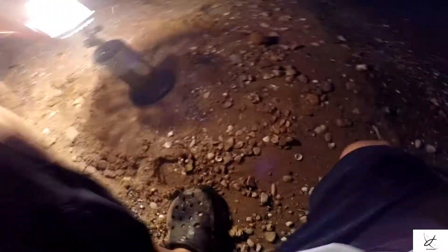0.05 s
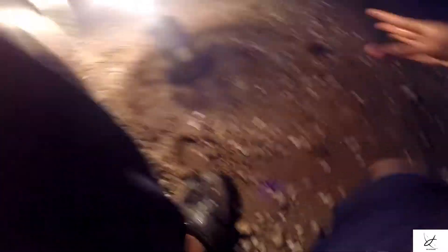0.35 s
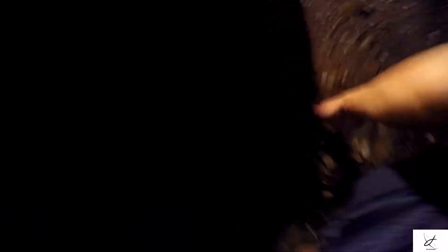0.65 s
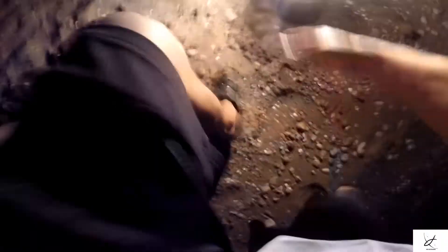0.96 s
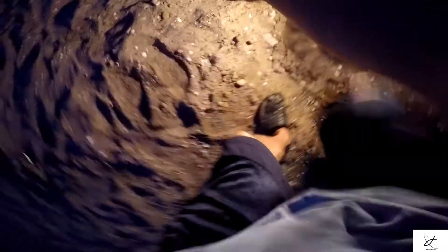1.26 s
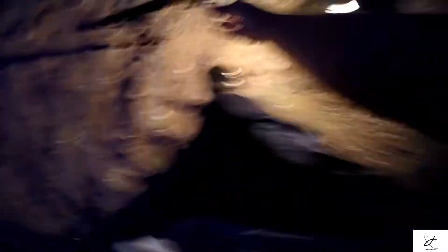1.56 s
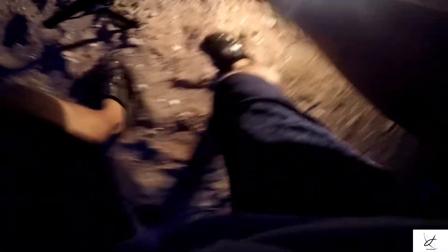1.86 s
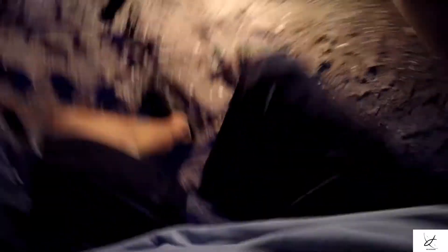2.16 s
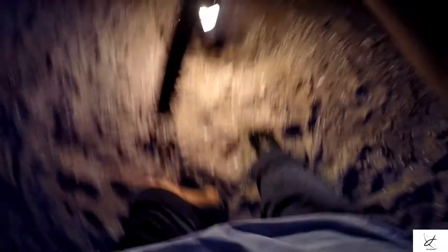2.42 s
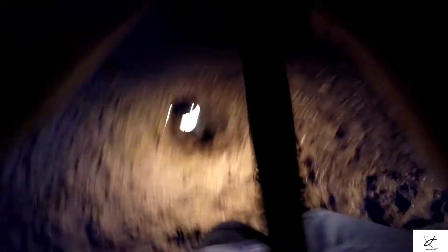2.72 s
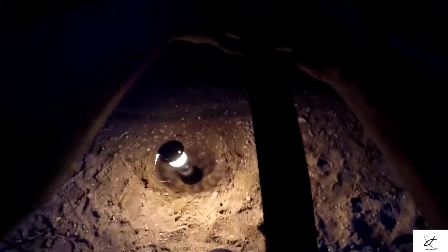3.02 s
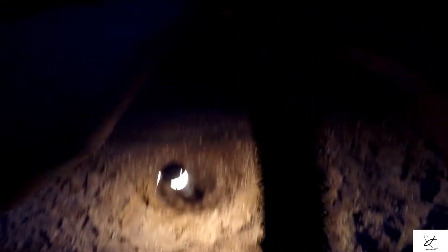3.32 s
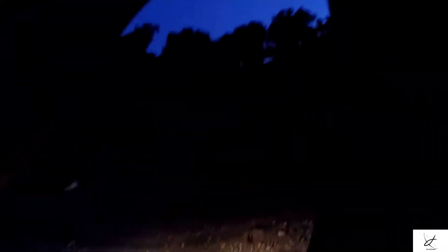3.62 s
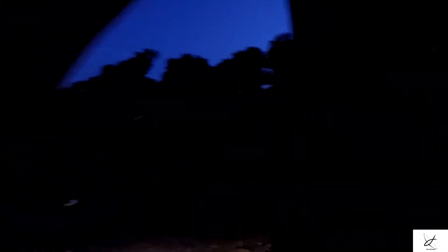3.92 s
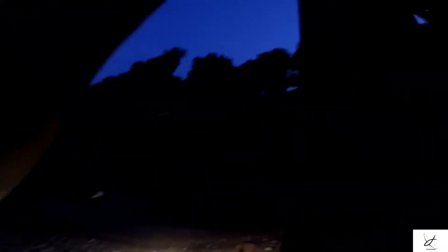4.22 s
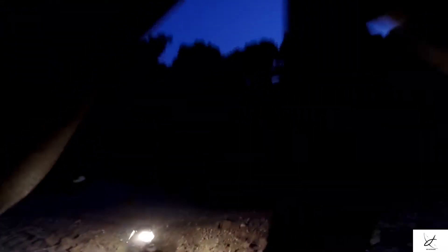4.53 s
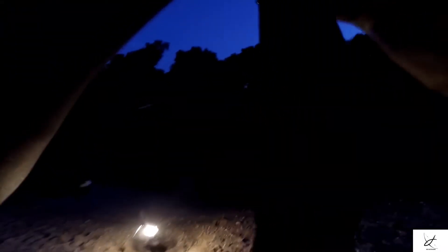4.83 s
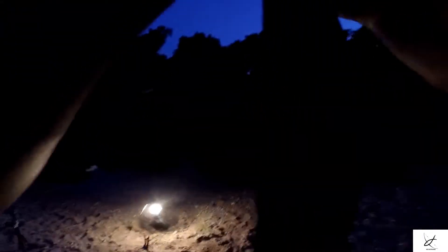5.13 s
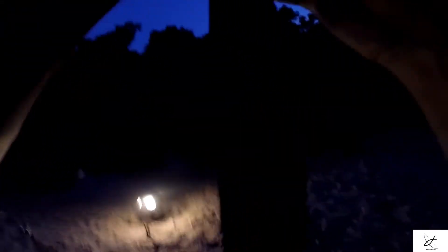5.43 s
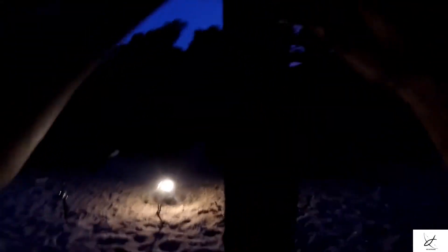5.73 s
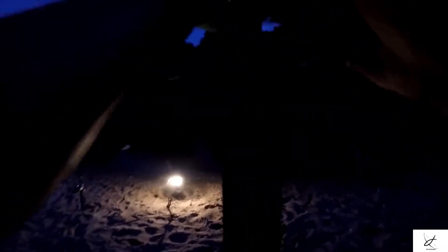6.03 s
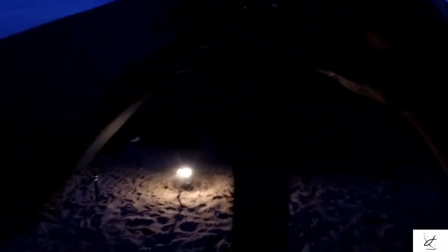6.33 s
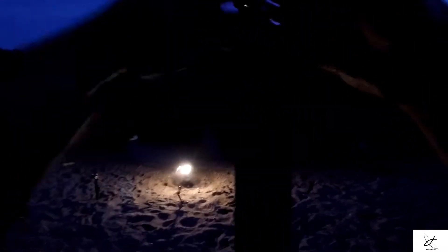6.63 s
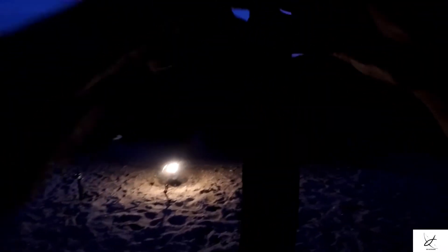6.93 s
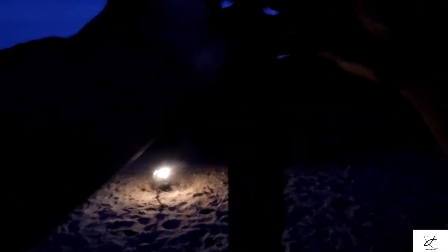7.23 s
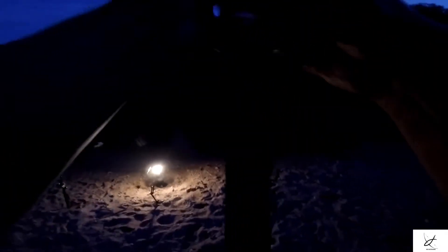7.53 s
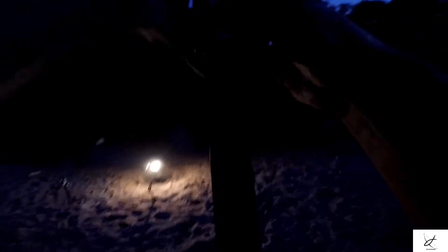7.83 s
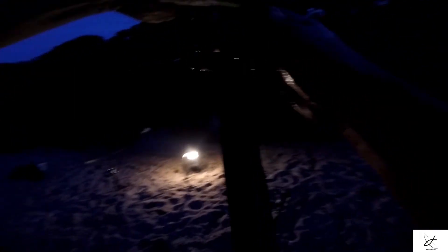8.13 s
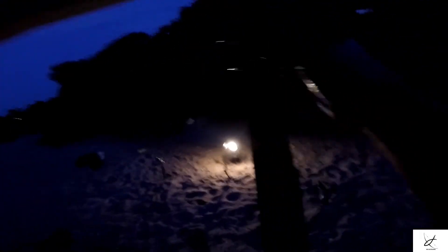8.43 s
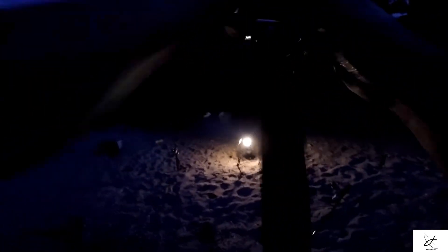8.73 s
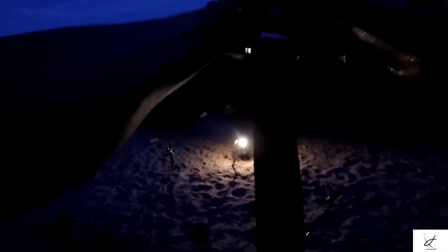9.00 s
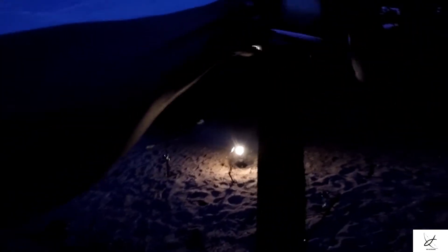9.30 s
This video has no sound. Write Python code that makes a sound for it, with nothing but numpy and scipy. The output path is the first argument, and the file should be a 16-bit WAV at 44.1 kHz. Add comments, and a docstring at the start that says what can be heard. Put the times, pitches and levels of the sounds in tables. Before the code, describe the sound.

A fishing reel ratchet whirrs in short runs, then cranking knocks and a small jingling bell sound close over rumbling clothes.

```python
"""A fishing reel's ratchet whirrs in four runs and snaps single clicks as its catch drops over the teeth.
An angler on a riverbank at night picks up the rod and cranks, close to a body-worn camera.
Every jolt jingles a small bite bell on the rod. Loose parts knock and clack, line rasps on the spool,
and clothes rub and rumble against the microphone."""
import sys
import numpy as np
from scipy import signal
from scipy.fft import rfft, irfft, next_fast_len
from scipy.io import wavfile
from scipy.ndimage import uniform_filter1d

SR = 44100
rng = np.random.default_rng(int(sys.argv[2]) if len(sys.argv) > 2 else 0)


def transcribe(signal):
    """Save signal, clipped to [-1, 1], as a 16-bit WAV file at the path in sys.argv[1]."""
    frames = np.atleast_2d(signal).T
    limited = np.clip(frames, -1, 1)
    pcm = np.round(limited * 32767).astype(np.int16)
    wavfile.write(sys.argv[1], SR, pcm)


N = 421596
T = np.arange(N) / SR


def amp(db):
    """Turns decibels into a volume factor."""
    return 10 ** (np.asarray(db) / 20)


def at_pitch(table, hz):
    """Looks up a frequency table at any pitch."""
    f, value = np.transpose(table)
    return np.interp(np.log(hz + 1), np.log(f), value)


def at_time(table, t=T):
    """Looks up a time table, normally at every sample."""
    return np.interp(t, *np.transpose(table))


def add(mix, at, sound):
    """Mixes a sound in, starting at a time in seconds."""
    part = mix[:, max(round(at * SR), 0):][:, :sound.shape[1]]
    part += sound[:, :part.shape[1]]


def drift(hz):
    """A slow random wobble, moving at up to about hz."""
    slow = irfft(rfft(rng.standard_normal(N)) / (1 + (np.fft.rfftfreq(N, 1 / SR) / hz) ** 4), N)
    return slow / slow.std()


# How alike the microphone's left and right openings sound: f/Hz, likeness (1 same, -1 opposite)
LIKENESS = [(40, 0.19), (130, -0.75), (200, -0.22), (300, 0.34), (1400, -0.19), (3100, 0.8), (6800, 0.5),
            (14000, -0.5)]

def resonate(force, tone, side, shared=0.82, size=8192):
    """Two forces shake an object, which gives them its tone; left and right partly agree."""
    hz = abs(np.fft.fftfreq(size, 1 / SR))
    log_gain = np.log(amp(at_pitch(tone, hz)))
    response = np.fft.ifft(np.exp(signal.hilbert(log_gain).conj())).real  # rings only after a push
    length = next_fast_len(N + size)
    a, b = rfft(force, length) * rfft(response / np.linalg.norm(response), length)
    hz = np.fft.rfftfreq(length, 1 / SR)
    lag = np.exp(-1j * np.arccos(np.clip(at_pitch(LIKENESS, hz) / shared, -1, 1)))
    lean = amp(at_pitch(side, hz) / 2)
    right = shared * lag * a + np.sqrt(1 - shared ** 2) * b
    return irfft(np.array([a * lean, right / lean]), length)[:, :N]


def click(length_s, tail_db, size=1100):
    """Hard parts meet, chatter for a moment and stop almost dead."""
    t = np.arange(size) / SR
    fade = np.exp(-(t / length_s) ** 2) + amp(tail_db) * np.exp(-t / .004)
    force = fade * (1 - np.exp(-t / .0003)) * rng.standard_normal((2, size))
    return force / np.linalg.norm(force, axis=1, keepdims=True)


def strike(notes, loose=0.0018, lag=0.74, uneven_db=3, size=18000):
    """A hit rings a part's notes, each fading 60 dB in about its ring time; looseness shifts the pitch."""
    t = np.arange(size) / SR
    hz, db, ring_s, side = np.transpose(notes)[:, :, None]
    share, detune, phase, turn, damping = rng.standard_normal((5, len(notes), 1))
    fade = amp(db + uneven_db * share - 60 * t / ring_s * np.exp(.2 * damping))
    ring = fade * np.exp(2j * np.pi * (hz * (1 + loose * detune) * t + phase))
    ring *= 1 - np.exp(-(t / .0007) ** 2)
    left = ring * amp(side / 2)
    right = ring / amp(side / 2) * np.exp(-1j * (lag + .5 * turn))
    return np.array([left.sum(0).imag, right.sum(0).imag])


def grit(pressure, per_s, spread_db, count=120, size=900):
    """Rubbing surfaces slip in tiny uneven steps, each a very short ping."""
    t, force = np.arange(size) / SR, np.zeros((2, N + size))
    hz = 200 + 11000 * (np.arange(count)[:, None] + rng.random((count, 1))) / count
    pings = np.exp(2j * np.pi * hz * t - t / .001 * (hz / 2000) ** .5)
    pings /= np.linalg.norm(pings, axis=1, keepdims=True)
    chance, big, which = rng.random(N), rng.exponential(1, N), rng.integers(0, count, N)
    phases = np.exp(2j * np.pi * rng.random((2, N)))
    at = np.flatnonzero(chance < per_s / SR)
    slips = amp(spread_db * np.minimum(big[at], 4))
    slips *= pressure[at] * np.sqrt(2 * N / np.sum(slips ** 2))
    for i, slip in zip(at[slips > 1e-5], slips[slips > 1e-5]):
        force[:, i:i + size] += slip * (phases[:, i, None] * pings[which[i]]).real
    return force[:, :N]


# Levels in all tables are relative. How hard the hands work, and how much the body sways: t/s, level/dB
EFFORT = [(0, -40.5), (0.7, -41.5), (0.95, -49.5), (1.4, -48.5), (3.2, -51), (3.9, -37.5), (5.15, -41.5),
          (5.9, -40), (6.3, -42), (7.1, -48.5), (8.7, -46.5), (9, -47.5), (9.56, -42)]
SWAY = [(0, -40.5), (.68, -17), (.92, -29.5), (1.4, -34.5), (1.78, -22.5), (1.95, -36), (3.2, -41),
        (4, -22.5), (5.2, -18), (6.75, -26), (7.05, -25), (7.46, -21.5), (7.57, -18), (7.68, -29),
        (8.6, -21.5), (9.56, -24.5)]
FULL_EFFORT_DB, RESTING_SWAY_DB = -39, -31
# The tone of rumbling clothes, rustling cloth and scraping gear: f/Hz, level/dB
RUMBLE_TONE = [(10, -6.5), (30, -7), (100, -18.5), (200, -35.5), (600, -90)]
RUSTLE_TONE = [(50, -7.5), (140, 7.5), (290, -5.5), (380, -2.5), (600, -11), (1500, -40.5)]
SCRAPE_TONE = [(200, 4.5), (650, -4.5), (850, 4), (1600, 6), (2250, -2.5), (2800, -2.5), (4000, 0.5),
               (5200, -5), (6700, 4), (7700, 0.5), (8600, -9.5), (10000, -6), (11500, -41.5)]
# Which way the rod and clothes lean in stereo: f/Hz, left minus right/dB
ROD_SIDE = [(60, -3), (200, -5), (2000, 2.5), (8000, -1.5)]

def clothes_and_gear(rumble_db=2.5, rustle_db=-33, scrape_db=-37, swish_db=-45, hiss_db=-55, wire_hz=2066):
    """Clothes sway and swish over the microphone while gear catches in uneven scrapes."""
    catching, effort, sway = drift(hz=23.4), at_time(EFFORT) - FULL_EFFORT_DB, at_time(SWAY)
    rumble = amp(sway + rumble_db + 2 * drift(hz=7.8)) * rng.standard_normal((2, N))
    stir = 0.7 * effort + 0.11 * (sway - RESTING_SWAY_DB)
    rustle = amp(stir + rustle_db + 4 * catching) * rng.standard_normal((2, N))
    scrape = grit(amp(effort + scrape_db + 4 * catching), per_s=1700, spread_db=2.5)
    # a thin wire on the reel sings along with the scraping
    wire = amp(10) * signal.lfilter(*signal.iirpeak(wire_hz, wire_hz / 16, SR), scrape)
    hiss = (amp(hiss_db) + amp(effort + swish_db)) * rng.standard_normal((2, N))
    cloth = resonate(rumble, RUMBLE_TONE, ROD_SIDE) + resonate(rustle, RUSTLE_TONE, ROD_SIDE)
    return cloth + resonate(scrape + wire + hiss, SCRAPE_TONE, ROD_SIDE)


def tooth_times(start, end, teeth, top_at, roundness, first_speed, last_speed=.15):
    """When each tooth passes as the spool speeds up and runs down."""
    progress = np.linspace(0, 1, 400)
    slowest = np.where(progress < top_at, first_speed, last_speed)
    from_top = np.interp(progress, [0, top_at, 1], [1, 0, 1])
    turned = np.cumsum(1 - (1 - slowest) * from_top ** roundness)
    marks = np.linspace(turned[0], turned[-1], round(teeth) + 1)
    return np.interp(marks, turned, start + progress * (end - start))


# Pulls of line: start/s, end/s, teeth, fastest point (0-1), roundness of the speed curve,
# starting speed (share of the top), click level/dB, spool ring level/dB
LINE_PULLS = [(.005, .194, 22, .16, .71, .64, 2, -18), (.33, .691, 32, .48, 1.03, .2, 2, -19.5),
              (1.525, 1.8245, 25, .53, 4.2, .29, 7, -21), (2.07, 2.569, 59, .42, .83, .14, 7.5, -25)]
# Single snaps of the catch: t/s, level/dB
LONE_SNAPS = [(1.002, -13), (1.0394, -11), (1.0776, -12.5), (1.131, -12.5), (1.947, -6), (2.973, -15),
              (2.9937, 1.5), (3.167, 1.5), (3.625, 6), (3.7696, -12), (6.127, 6.5), (7.383, 2.5),
              (8.2399, -4.5), (8.5194, -13.5)]
# The tone of a click, and of the catch sliding up a tooth: f/Hz, level/dB
REEL_TONE = [(300, -43), (1200, -16.5), (1900, -8), (2800, -6), (3850, 0), (4550, -3.5), (5400, 1.5),
             (6300, 7.5), (7500, 9), (8700, -2.5), (10400, -8), (12000, -19), (15000, -16.5)]
SLIDE_TONE = [(900, -17), (1900, 7.5), (2700, 2.5), (3800, 7.5), (9000, 7.5)]
# Notes of the reel's housing: f/Hz, level/dB, ring time/s, left minus right/dB
HOUSING_NOTES = [(3700, -20, 0.06, -7), (5000, 2.5, 0.0076, -5)]
# Which way the reel leans in stereo: f/Hz, left minus right/dB
REEL_SIDE = [(3000, 2.5), (6300, 3), (8800, -2), (14000, 1)]
TOOTH, SNAP = (.0032, -6), (.0021, -12)  # click shapes: length/s, tail level/dB

def ratchet(run_db=-0.34, snap_db=15, housing_db=-26, slide_db=-36, fast_teeth_per_s=170, jitter_s=.0005):
    """The catch clicks on every tooth and rings the spool; lone snaps are shorter and harder."""
    clicks, rings = np.zeros((2, 2, N))
    sliding = np.zeros(N)
    spool = [(1920, -3, 0.021, 9)]  # columns as in HOUSING_NOTES
    for *pull, db, ring_db in LINE_PULLS:
        times = tooth_times(*pull)
        gaps = np.gradient(times)
        speeds = 1 / (gaps * fast_teeth_per_s)
        sliding += amp(db + slide_db) * np.interp(T, times, speeds, 0, 0) ** .5
        for at, gap, speed in zip(times + jitter_s * rng.standard_normal(len(times)), gaps, speeds):
            drop = min(gap / .02, 1) ** .2  # at speed the catch has less time to fall
            add(clicks, at, drop * amp(db + run_db + 1.1 * rng.normal()) * click(*TOOTH))
            add(rings, at, drop * amp(ring_db) * strike(spool, loose=0.042, lag=0))
            rasp = strike(HOUSING_NOTES, loose=0.04, lag=0, size=1200)
            add(rings, at, amp(db + housing_db) * speed * rasp)
    for at, db in LONE_SNAPS:
        add(clicks, at, amp(db + snap_db) * click(*SNAP))
        add(rings, at, amp(1.17 * min(db, 0) - 12) * strike(spool, loose=0.05, lag=0))
    slide = grit(sliding, per_s=3400, spread_db=2)
    return resonate(clicks, REEL_TONE, REEL_SIDE) + resonate(slide, SLIDE_TONE, REEL_SIDE) + rings


def swells(rows):
    """Pressure that rises and falls smoothly, once for each row."""
    return sum(amp(db) * np.exp(-(2 * (T - at) / length) ** 2) for at, length, db in rows)


# Sleeves passing the camera: middle t/s, length/s, level/dB
SLEEVE_PASSES = [(.13, 0.24, -30.5), (.805, 0.049, -23.5), (1.76, 0.2, -32), (3.6, 0.26, -31),
                 (8.15, 0.29, -30.5), (8.55, 0.057, -28), (9, 0.28, -35)]

def sleeves(scuff_db=-13):
    """A sleeve brushes the camera case: a soft, low rustle with a little grit."""
    pressure = swells(SLEEVE_PASSES)
    scuff = grit(amp(scuff_db) * pressure, per_s=1500, spread_db=0.5)
    rustle = pressure * rng.standard_normal((2, N))
    return resonate(rustle, RUSTLE_TONE, ROD_SIDE) + resonate(scuff, SCRAPE_TONE, ROD_SIDE)


def stray_taps(per_s, db, effort_slope, spread_db, crank_from_s=3.2):
    """Small chance taps once cranking starts, louder with effort: rows of t/s, level/dB."""
    wait, luck = rng.random((200, 2)).T
    times = crank_from_s + np.cumsum(.5 + wait) / per_s
    effort = at_time(EFFORT, times) - FULL_EFFORT_DB
    levels = db + effort_slope * effort + spread_db * (2 * luck - 1)
    return [(at, level) for at, level in zip(times, levels) if at < N / SR]


# The stronger jolts of the rod: t/s, bell level/dB, clamp level/dB
ROD_JOLTS = [(.124, -23.5, -33), (.236, -20, -26), (.295, -17, -38), (1.261, -31, -34), (1.39, -33, -45),
             (1.456, -30, -48), (2.025, -28.5, -40), (2.657, -24, -37), (3.249, -31, -45),
             (3.369, -29.5, -28), (3.508, -32.5, -28), (3.586, -22, -20), (3.604, -39, -22.5),
             (3.975, -27, -15.5), (4.061, -27, -24.5), (4.219, -25, -17.5), (4.306, -22, -22),
             (4.407, -24, -24), (4.61, -24.5, -16.5), (4.747, -21.5, -15), (4.838, -25.5, -14),
             (4.914, -27, -21.5), (4.95, -20.5, -19.5), (5.016, -25.5, -18.5), (5.088, -25, -15.5),
             (5.163, -22, -19.5), (5.324, -26.5, -15.5), (5.412, -25, -13.5), (5.521, -30.5, -25),
             (5.665, -32, -19), (5.704, -28, -22), (5.739, -27.5, -16), (5.785, -24.5, -15),
             (5.816, -18.5, -21), (6.0, -18.5, -18.5), (6.061, -27.5, -15.5), (6.161, -28, -38),
             (6.351, -21, -43), (6.481, -27.5, -40), (6.533, -25.5, -36), (6.641, -24.5, -24),
             (6.675, -27, -21), (6.908, -30, -28), (6.944, -22, -30), (7.275, -30, -25.5),
             (7.352, -24, -19), (7.472, -27, -29.5), (7.64, -25.5, -28), (7.708, -28.5, -40),
             (7.795, -29, -29.5), (7.888, -31.5, -41), (7.908, -23, -43), (8.022, -27.5, -37),
             (8.094, -22, -40), (8.204, -28.5, -33), (8.285, -28.5, -39), (8.393, -30, -32),
             (8.815, -17.5, -20.5), (9.03, -22.5, -26), (9.066, -26.5, -34), (9.112, -24.5, -32),
             (9.243, -23.5, -27), (9.294, -17, -21), (9.421, -18.5, -28.5)]
# Notes of the bell, its high shimmer and its clamp: f/Hz, level/dB, ring time/s, left minus right/dB
BELL_NOTES = [(3505, -24.5, .28, 5), (6984, -18, .48, 4), (7703, -1, .15, -4), (8163, -2.5, .135, -5),
              (9135, -3.5, .065, -4), (13874, -22, .16, 7), (14647, -22, .14, 6)]
SHIMMER_NOTES = [(11612, -10, .2, 2), (12414, 0, .19, 5)]
CLAMP_NOTES = [(4570, 7.5, .028, 1.5), (4640, 5, .024, -.5), (4100, 0, .02, 2)]

def bite_bell(ring_db=4, bounce_db=-13, bounce_s=0.03, shimmer_db=-24, clamp_db=-3.5, tick_db=12):
    """Each jolt throws a pellet against the bell and it bounces once; the bell's clamp chatters."""
    rings, ticks = np.zeros((2, 2, N))
    taps = stray_taps(per_s=16, db=-34, effort_slope=1.66, spread_db=2.5)
    for at, level, clank in list(ROD_JOLTS) + [(at, db, db + 2) for at, db in taps]:
        add(rings, at, amp(level + ring_db) * strike(BELL_NOTES, uneven_db=3.2))
        bounce_at = at + bounce_s * (.5 + rng.random())
        add(rings, bounce_at, amp(level + ring_db + bounce_db) * strike(BELL_NOTES))
        add(rings, at, amp(clank + shimmer_db) * strike(SHIMMER_NOTES))
        for contact in range(4):  # the clamp hits four times, softer each time
            db = clank - 4.5 * contact
            add(rings, at, amp(db + clamp_db) * strike(CLAMP_NOTES, loose=.012, uneven_db=2, size=4000))
            add(ticks, at, amp(db + tick_db) * click(*SNAP))
            at = at + .008 * (.5 + rng.exponential())
    return rings + resonate(ticks, SCRAPE_TONE, ROD_SIDE)


# Firm knocks of the crank and rod: t/s, hit level/dB, hollow thud level/dB
FIRM_KNOCKS = [(.399, -16, -31.5), (3.792, -20, -32), (3.867, -16.5, -27), (3.924, -17, -25),
               (3.967, -19, -27), (4.04, -15.5, -25.5), (4.2, -19, -25.5), (4.38, -15, -22),
               (4.481, -17.5, -34), (4.6, -18, -27), (4.725, -18, -23), (4.77, -29, -32),
               (4.803, -15.5, -30), (4.885, -21.5, -26), (4.929, -12, -24.5), (5.004, -15.5, -23),
               (5.074, -13.5, -20.5), (5.157, -19.5, -21.5), (5.2, -17, -46), (5.318, -19, -39),
               (5.401, -18, -29), (5.456, -15, -36), (5.496, -12, -45), (5.648, -18.5, -51),
               (5.979, -14.5, -25), (6.262, -24.5, -29), (6.585, -23.5, -25), (7.544, -23, -21.5),
               (8.015, -21.5, -41), (8.858, -23.5, -27.5), (8.964, -19.5, -46)]
# Notes of the seat that holds the reel: f/Hz, level/dB, ring time/s, left minus right/dB
SEAT_NOTES = [(377.4, -4.5, 0.066, -1.5), (842, -6, 0.075, 3), (983, -12, 0.08, 8), (1227, -7.5, 0.093, -1),
              (1485, -10, 0.091, 0.5), (1846, -19.5, 0.16, 17.5)]
# The tone of the hollow thud: f/Hz, level/dB
THUD_TONE = [(60, -26), (190, 3), (290, -9), (378, -0.5), (480, -11), (1000, -46)]

def crank(scuff_db=-7, thud_db=9, seat_db=-3.5, rise_s=.004, decay_s=.011, size=4000):
    """The loose crank and rod knock: a gritty scuff and a ring of the seat over a hollow thud."""
    t = np.arange(size) / SR
    pressure, thuds, rings = np.zeros((1, N)), np.zeros((2, N)), np.zeros((2, N))
    shape = (1 - np.exp(-t / rise_s)) * np.exp(-t / decay_s)
    taps = stray_taps(per_s=11, db=-29, effort_slope=0.7, spread_db=3)
    light_knocks = [(at, db, db - 11.5) for at, db in taps]  # thin, with little thud
    for at, db, hollow in list(FIRM_KNOCKS) + light_knocks:
        add(pressure, at, amp(db + scuff_db) * shape[None])
        add(thuds, at, amp(hollow + thud_db) * shape * rng.standard_normal((2, size)))
        add(rings, at + rise_s, amp(db + seat_db) * strike(SEAT_NOTES, loose=0.045, uneven_db=2))
    scuffs = grit(pressure[0], per_s=2500, spread_db=-2.5)
    return rings + resonate(scuffs, SCRAPE_TONE, ROD_SIDE) + resonate(thuds, THUD_TONE, ROD_SIDE)


# Bumps against the camera: t/s, level/dB
CASE_BUMPS = [(0.717, -16), (0.783, -16), (.826, -14.5), (0.834, -13.5), (0.904, -19)]
# The tone of its case: f/Hz, level/dB
CASE_TONE = [(60, -3), (175, 9.5), (350, -18.5), (900, -15.5), (3000, -33.5), (8000, -54)]

def camera_bumps(bump_db=20, push_s=.0001):
    """Short, crunchy pushes on the camera case."""
    force = np.zeros((2, N))
    for at, db in CASE_BUMPS:
        crunch = click(length_s=0.01, tail_db=-2)
        push = np.exp(-np.arange(crunch.shape[1]) / SR / push_s)
        add(force, at, amp(db + bump_db) * (push / np.linalg.norm(push) + crunch))
    return resonate(force, CASE_TONE, ROD_SIDE)


# Drags of line on the spool: middle t/s, length/s, level/dB
LINE_DRAGS = [(4.362, .1, -28.5), (4.672, 0.011, -25.5), (5.215, 0.04, -32), (6.585, 0.025, -30)]

def line_rasps():
    """Line drags over the rim of the spool in short, bright rasps."""
    return resonate(grit(swells(LINE_DRAGS), per_s=13000, spread_db=1), REEL_TONE, ROD_SIDE)


# Hard clacks of the reel: t/s, level/dB
HARD_CLACKS = [(6.211, -21), (7.544, -14), (7.589, -17.5), (8.5205, -15.5), (8.925, -19.5), (9.025, -14),
               (9.121, -18.5)]

def reel_clacks(crack_db=21, seat_db=-16):
    """Hard parts of the reel hit their stops: a sharp crack and a brief ring of the seat."""
    cracks, rings = np.zeros((2, 2, N))
    for at, db in HARD_CLACKS:
        add(cracks, at, amp(db + crack_db) * click(length_s=.003, tail_db=-9))
        add(rings, at, amp(db + seat_db) * strike(SEAT_NOTES, loose=0.099))
    return rings + resonate(cracks, SCRAPE_TONE, ROD_SIDE)


def scene():
    """Everything is within arm's reach, in open air."""
    tackle = ratchet() + bite_bell() + crank() + reel_clacks() + line_rasps()
    return tackle + sleeves() + camera_bumps() + clothes_and_gear()


def record(dry):
    """A limiter turns the sound down briefly at the hardest snaps; then the highest treble is cut."""
    ceiling_db, recover_db_per_s, cutoff_hz = -1, 92.5, 15400
    over_db = np.maximum(20 * np.log10(abs(dry).max(0) + 1e-9) - ceiling_db, 0)
    recovery = recover_db_per_s * T
    dip_db = uniform_filter1d(np.maximum.accumulate(over_db + recovery) - recovery, size=24)
    limited = np.clip(dry * amp(-dip_db), -1, 1)
    treble_cut = signal.firwin(151, cutoff_hz, window=("kaiser", 8), fs=SR)
    return signal.oaconvolve(limited, treble_cut[None], "same")


dry = scene()
out = record(dry)
transcribe(out)
```